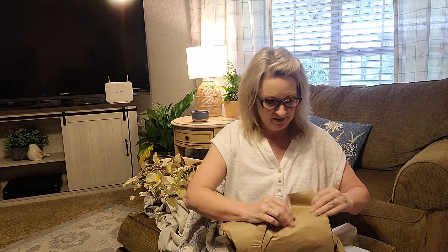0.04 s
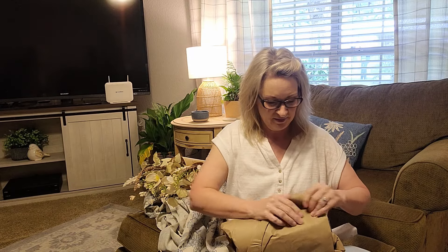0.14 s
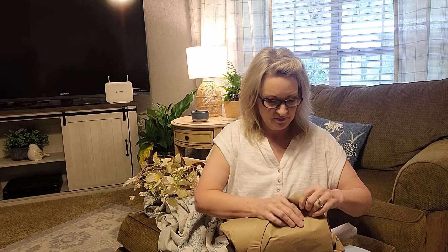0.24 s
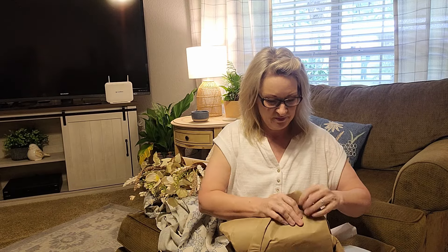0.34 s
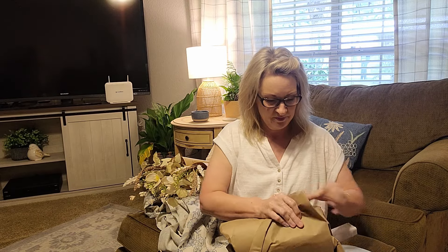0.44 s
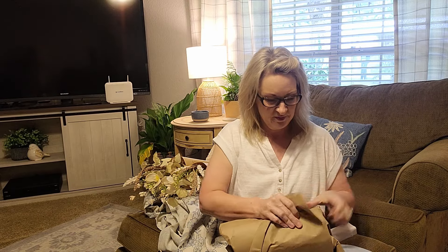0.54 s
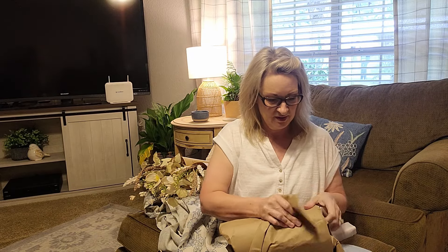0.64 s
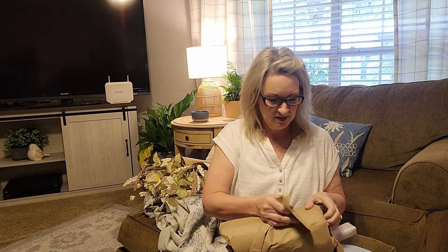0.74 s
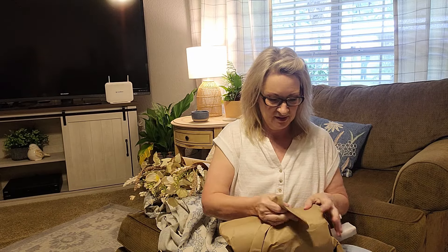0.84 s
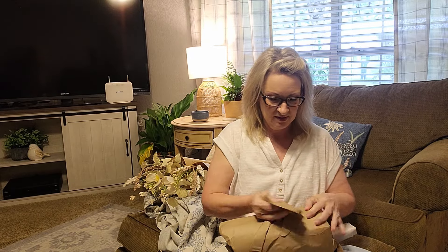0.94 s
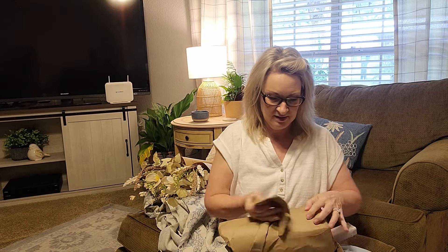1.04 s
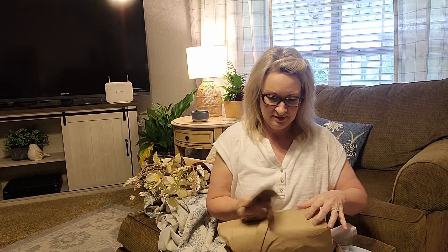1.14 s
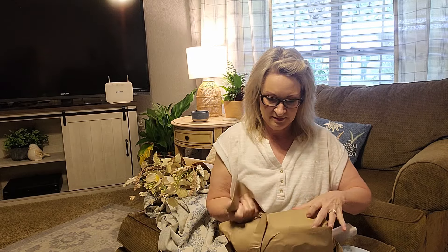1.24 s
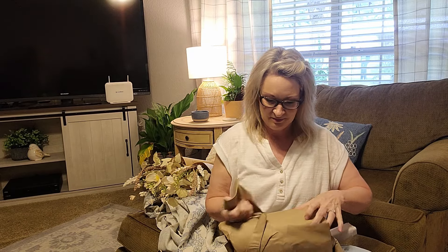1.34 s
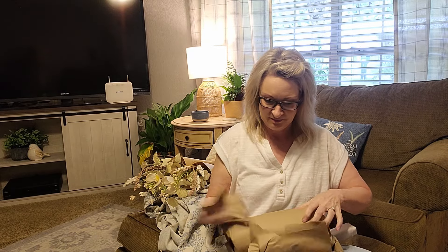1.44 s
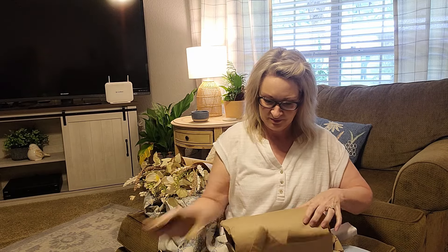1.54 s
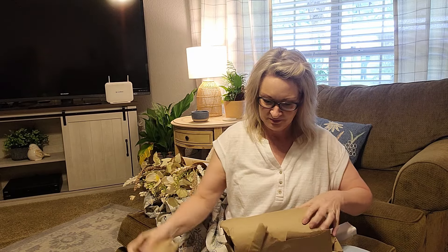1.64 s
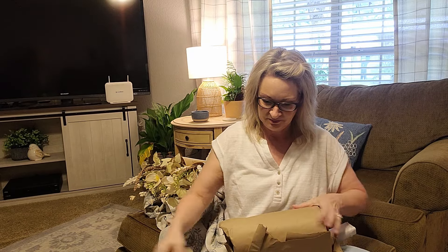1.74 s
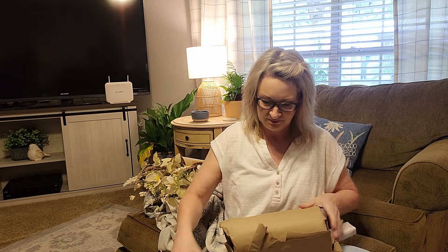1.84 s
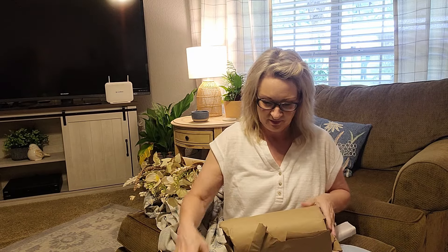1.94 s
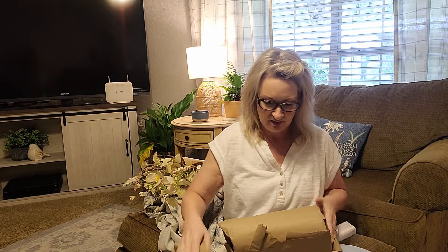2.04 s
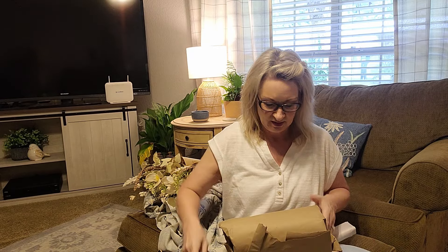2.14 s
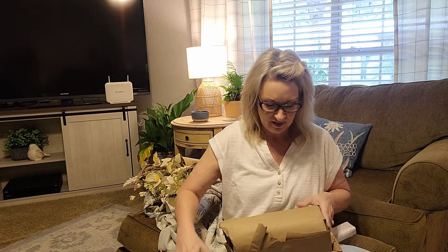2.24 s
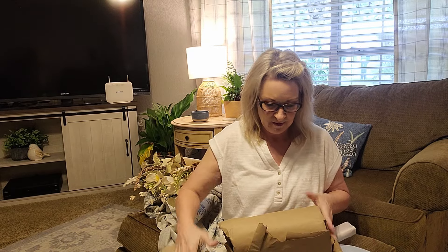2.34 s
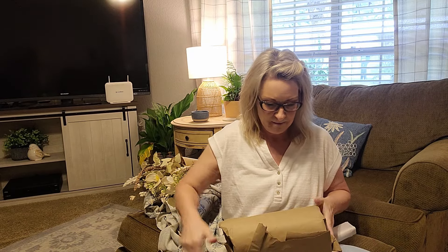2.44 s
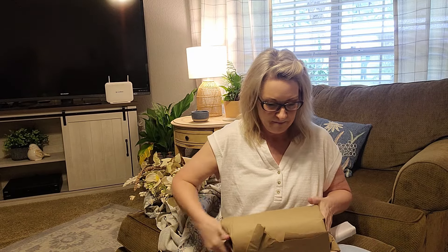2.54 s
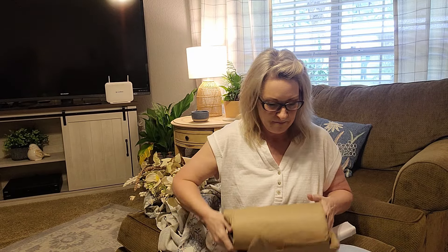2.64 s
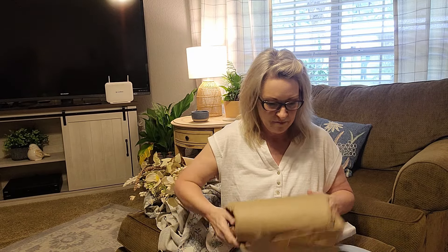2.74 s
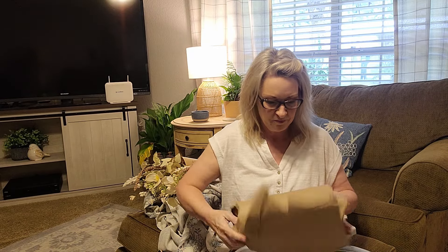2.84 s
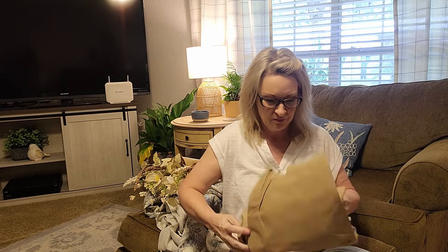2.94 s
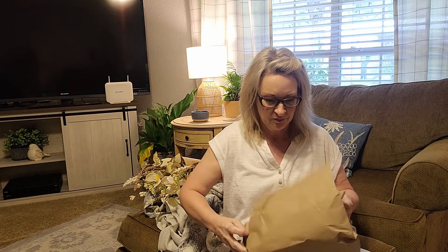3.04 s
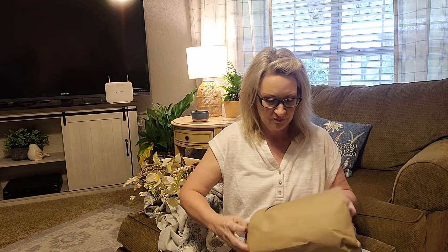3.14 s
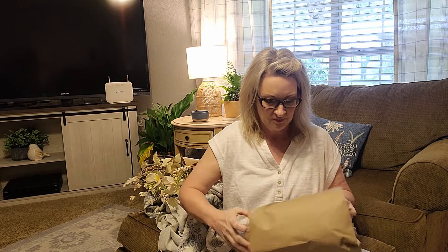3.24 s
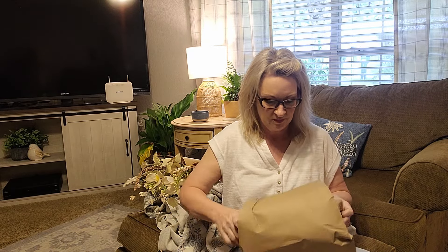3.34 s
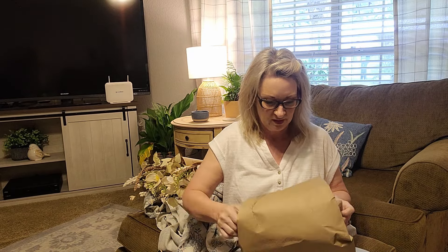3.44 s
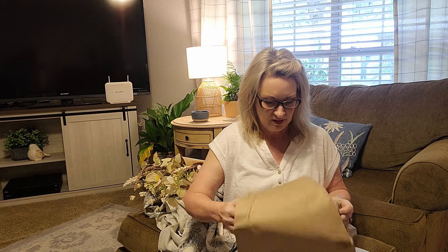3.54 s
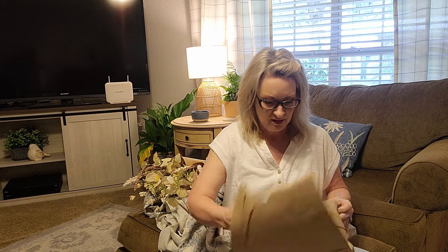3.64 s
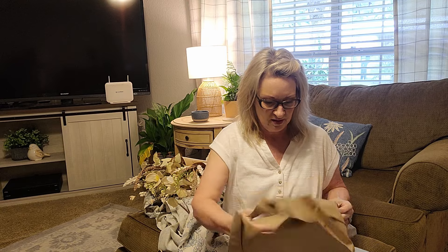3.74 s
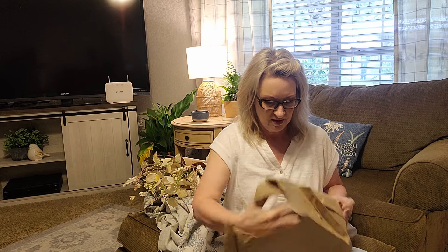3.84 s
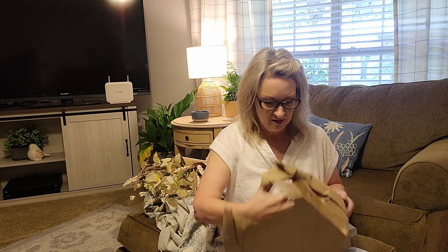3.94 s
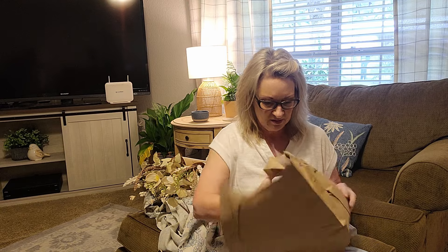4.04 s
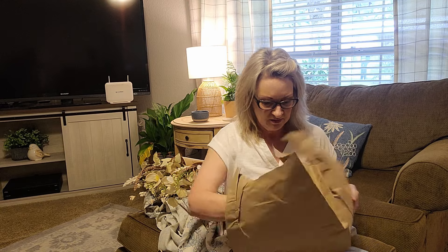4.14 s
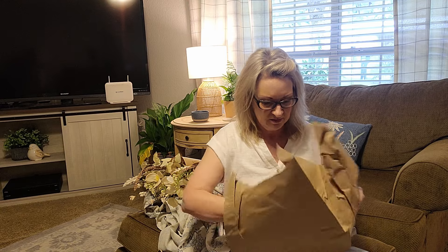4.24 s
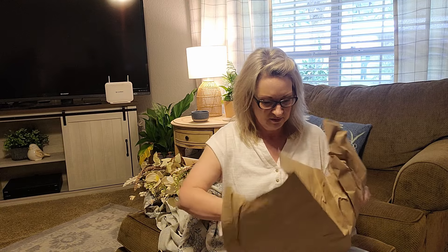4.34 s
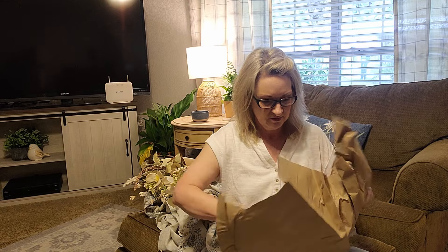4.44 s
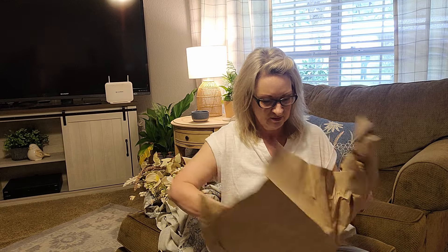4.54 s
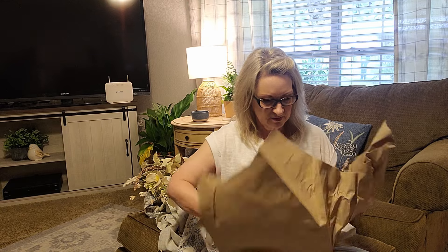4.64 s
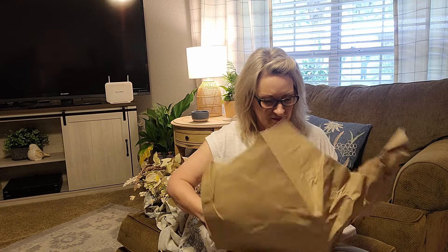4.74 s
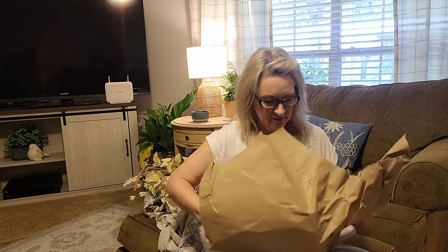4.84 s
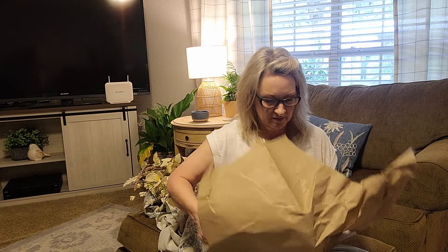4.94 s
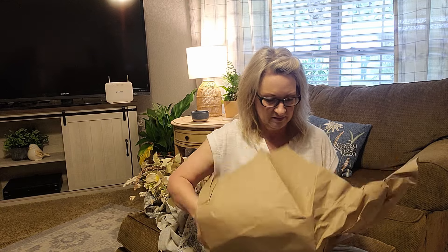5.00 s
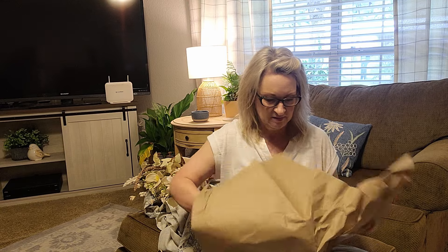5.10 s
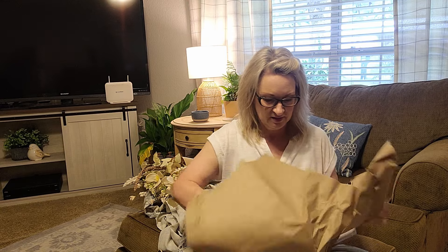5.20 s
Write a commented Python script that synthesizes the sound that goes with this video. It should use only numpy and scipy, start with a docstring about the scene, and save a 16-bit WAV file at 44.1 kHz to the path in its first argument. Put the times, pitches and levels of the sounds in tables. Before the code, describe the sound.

Stiff brown wrapping paper crackles and snaps sharply as hands tear, turn and pull open a soft parcel in a quiet furnished living room.

```python
"""Sharp snaps and clumped dry crackles over hollow booms: stiff brown paper round a parcel is torn,
turned and pulled open by hand in a furnished living room.
Noise bursts make the creases that buckle; ringing modes make the parcel's panels and hollow; falling
sines make its soft bumps. Two close microphone ports hear the paper, the left a little earlier,
with a short soft room and a bed of low air noise."""
import sys
import numpy as np
from scipy import signal
from scipy.fft import rfft, irfft, next_fast_len
from scipy.io import wavfile
from scipy.ndimage import map_coordinates

SR = 44100
rng = np.random.default_rng(int(sys.argv[2]) if len(sys.argv) > 2 else 0)


def materialize(psi):
    """Save the field psi as 16-bit PCM at rate SR to the path in sys.argv[1].

    A 1-D psi becomes a single channel; in a 2-D psi each row is a channel.
    """
    bounded = np.clip(np.atleast_2d(psi).T, -1, 1)
    quanta = np.round(bounded * 32767).astype(np.int16)
    wavfile.write(sys.argv[1], SR, quanta)


N = 232346

# Large creases that buckle: (t/s, level/dB before colouring, crease f/Hz,
# then pairs for the body: boom/dB re level, boom f/Hz, knock/dB re level, knock f/Hz,
# then crisp edge/dB re level, fibre fizz/dB re level before any lift, left-right/dB)
CREASES = [(0.0817, -27, 1620, -19, 307, -10, 1280, -8, -30, -2),
           (0.1191, -15.5, 6800, -39, 522, -25, 1400, -8, -21, 10.5),
           (0.128, -25.5, 2000, -35, 377, -27, 1260, -6, -25, -9),
           (0.1467, -33, 2800, -11, 361, -2, 860, -7, -17, -1),
           (0.177, -19.5, 1750, -24, 291, -14.5, 853, -3, -21, 5),
           (0.2674, -29, 2860, -15, 433, -5, 1190, -12, -27, 1.5),
           (0.2773, -29, 1560, -22, 404, -12, 1190, -11, -9.5, 5),
           (0.3042, -27.5, 1590, -12.5, 320, -11, 781, -22, -32, 1.5),
           (0.3292, -31.5, 1510, -34, 390, -2, 1190, -23, -34, -1),
           (0.4051, -36, 2020, -5, 415, -5, 1200, -2, -15, 1),
           (0.4539, -25, 1420, -7, 423, -7, 1260, -6, -19, 1.0),
           (0.4988, -34, 1610, -31, 285, -8, 1130, -3, -31, 2.5),
           (0.5327, -23, 6900, -34, 269, -34, 1240, -3, -12, 3),
           (0.5503, -30, 4400, -7, 431, -7, 1160, -7, -7, 2),
           (0.5826, -17.5, 3720, -13.5, 396, -20, 1170, -10, -9, 3),
           (0.617, -19.5, 1450, -10.5, 358, -4.5, 1260, -19, -19, -2),
           (0.6579, -27, 1670, -2, 299, -6.5, 770, -13, -24, 2.5),
           (0.6908, -25, 7560, -13, 277, -23, 805, -3.5, -25, 4),
           (0.7253, -25.5, 1780, -36, 248, -31, 1280, -16, -23, 4),
           (0.7687, -26, 7520, -17, 304, -12, 1190, -10, -25, 5),
           (0.798, -30, 5100, -3.5, 312, -9, 840, -10, -24, 2),
           (0.819, -20.5, 1410, -24, 191, -18, 929, -2, -12, 5),
           (0.8799, -18.5, 7490, -21, 269, -20, 797, -6, -13, 0),
           (0.9143, -23, 7300, -44, 212, -25, 1340, -17, -4.5, 4),
           (0.9283, -15, 2370, -27, 250, -23, 1360, -13, -10, 0),
           (0.9408, -11, 2280, -18.5, 285, -10, 1190, -11, -22, 1.5),
           (0.956, -11, 7200, -25, 296, -31, 1130, -7, -15, 4),
           (1.074, -27, 4330, -14, 400, -28, 1130, -8, -8, 2.5),
           (1.1418, -21.5, 2890, -25, 447, -5.5, 1090, -19, -16, -3),
           (1.1717, -17, 2030, -15, 310, -22, 773, -19, -13.5, 3),
           (1.2146, -25.5, 4740, -35, 506, -15, 740, -8, -15, 8),
           (1.2379, -15.5, 3220, -18, 490, -16, 1010, -16, -17, 3),
           (1.4102, -30, 2890, -23, 382, -16, 1180, -1, -19, 2.0),
           (1.4486, -17, 7360, -22, 501, -31, 1200, -1, -10, 3),
           (1.4716, -17, 3370, -17, 304, -6.5, 1180, -14.5, -15, 0.5),
           (1.5349, -8.5, 1630, -19.5, 345, -12.5, 1430, -18, -27, -4),
           (1.6417, -31, 3800, -24, 425, -9, 861, 0, -24, 3.5),
           (1.7374, -34, 2450, -17, 231, -9, 1280, -10.5, -23, 9),
           (1.8734, -42.5, 1390, -12, 307, -8, 990, -7, -20, 1.5),
           (1.9634, -44, 3240, -19, 400, -13, 1160, -10, -31, -4),
           (2.1377, -40.5, 1430, -5.5, 304, -5, 799, -13, -29, -2),
           (2.1855, -41, 4700, -19, 549, -2, 1190, -7, -13, 4),
           (2.2574, -47.5, 3580, 1.5, 324, -17, 799, -8, -7, 7),
           (2.3725, -33.5, 2410, -12, 301, -6.5, 860, -12, -41, 4),
           (2.4169, -39, 2350, 1, 159, -4, 1020, -6, -29, -1),
           (2.5351, -41.5, 1420, 11.5, 435, 10.5, 853, -8.5, -34, 2),
           (2.5636, -27.5, 1340, -26, 388, -16, 1390, -10, -19, 0.5),
           (2.5813, -30, 1710, -7, 417, -13, 1220, 2.5, -13, 0),
           (2.6135, -22.5, 1850, -12, 490, -18, 1200, 2.5, -10.5, 3.5),
           (2.6499, -30, 4620, -7, 503, -5, 867, -14, -17, -5),
           (2.7167, -29.5, 3600, -27, 506, -0.5, 1140, -14, -35, 1.0),
           (2.8884, -34.5, 1750, -2, 477, -4, 926, -7, -25, 2.0),
           (2.9118, -27.5, 4600, -3, 304, -1.5, 820, -2, -13, 1),
           (3.0086, -31.5, 4940, -25, 476, -27, 1300, 1, -17, -1),
           (3.0306, -29, 1980, -13, 328, -4, 732, -7, -26, -1),
           (3.0485, -23.5, 2850, -12.5, 396, -9, 1140, -8, -36, -1),
           (3.0844, -23.5, 2140, -33, 503, -6, 1140, -7, -36, 2.0),
           (3.1308, -29, 4050, -13, 310, 1, 804, -5, -22, 4),
           (3.1662, -30.5, 1940, -20, 398, 3, 853, -12, -32, 4),
           (3.1956, -31.5, 2460, -18, 404, -8, 848, -13, -38, -9),
           (3.2385, -30.5, 1660, -6, 310, -2, 840, -7, -32, 1.0),
           (3.2829, -31, 1960, -23, 410, -18, 1040, -20, -31, -4),
           (3.3004, -17.5, 1380, -10, 315, -4, 920, -8.5, -29, 0),
           (3.3383, -25, 3400, -27, 409, -20, 1030, -6, -24, 7),
           (3.3718, -35.5, 1600, 2.5, 153, 0, 780, -3, -26, 1),
           (3.4555, -25.5, 3680, -10, 161, -2, 1190, 2, -11, 2),
           (3.5015, -32, 1960, -15, 430, 0, 859, -13, -23, 1.0),
           (3.5249, -31, 1910, -24, 339, -23, 880, -11, -31, -4),
           (3.5622, -27, 3150, -18, 428, -1, 730, 4, -9, -1),
           (3.5713, -14.5, 7110, -32, 312, -9.5, 719, 0, -17.5, 1),
           (3.6194, -24, 1590, -5, 405, -3, 859, -11, -22, 2.0),
           (3.6401, -17, 1410, -16, 487, -5.5, 869, -12, -27, 1.0),
           (3.6794, -27, 1460, -2.5, 494, 4, 755, -24, -23, -2),
           (3.7738, -30, 1780, -8, 550, -1, 1170, -11, -27, 5),
           (3.8463, -35, 1522, -10, 307, -1.5, 1120, -22, -35, -6),
           (3.896, -26.5, 2100, -10, 326, 1.5, 867, 1, -25, 2.5),
           (4.0552, -29, 1520, -7, 382, -1.5, 1230, -8, -29, 4),
           (4.115, -32.5, 3300, -6, 315, -14, 1190, -12, -16, 3),
           (4.2076, -38, 4730, 10.5, 354, 9, 818, -8, -31, -1),
           (4.2276, -32, 1710, -8, 304, -5, 790, -19, -27, -8),
           (4.4134, -28.5, 3500, -22, 143, -21, 1370, -4, -30, 2.5),
           (4.4268, -29, 1420, -5.5, 318, -21, 1020, -1, -23, 1),
           (4.4608, -24, 2740, -18, 296, -13, 795, -22, -32, 0.5),
           (4.5186, -33, 1440, 6.5, 310, 3.5, 805, -11, -31, 1.5),
           (4.5635, -23.5, 1520, -15, 151, -14, 910, -6, -34, -1),
           (4.6468, -27, 1460, -9, 301, -7, 1410, -14, -31, -4),
           (4.7267, -18, 1520, -25, 310, -11, 719, -1, -23, 1),
           (4.8155, -21.5, 1400, -15, 417, -3, 1280, -2, -39, -1),
           (4.8589, -26, 1860, -7, 310, -17, 1130, -25, -43, 0),
           (4.9015, -35, 1610, 4, 307, -1, 832, -16, -33, 2.0),
           (4.9327, -17, 2380, -8.5, 407, -12, 853, 3, -13.5, 0.5),
           (5.0264, -28, 1410, -15, 318, -22, 1400, -14, -40, 3),
           (5.0449, -21, 1560, -31, 320, -25, 988, -7, -43, -10),
           (5.0883, -22, 3400, -28, 525, -7, 974, -3, -24, 1),
           (5.1542, -26.5, 1430, -2.5, 312, -1, 918, -14, -25, 1.0),
           (5.1766, -17.5, 4000, -12.5, 291, -6, 848, -1, -18.5, 2.0),
           (5.1946, -25.5, 5600, -3.5, 480, -10, 1210, -2, -25, 1),
           (5.2245, -19.5, 1390, -8.5, 296, -3.5, 869, -2, -17, 2.5)]
# Moves of the hands (tugs, tears, folds), each a swell of crackle:
# (t of peak/s, rise/s, fall/s, peak level/dB, then re that level: fizz/dB, knock/dB, boom/dB)
HAND_MOVES = [(.01, 0.15, 0.023, -41.5, -12.5, -5, -2.5), (.14, 0.068, 0.049, -42.5, -5, -3, -16),
              (.3, 0.18, 0.19, -47.5, -18, -2, -8), (.46, 0.065, 0.04, -46, -18, -12.5, -9),
              (.6, 0.05, 0.15, -40, -3, -12, -12), (.65, 0.05, .05, -41.5, -3, 5, 3),
              (.7, 0.094, 0.088, -37.5, -4.5, -5, -4.5), (.83, .1, 0.042, -37, -2.5, -3.5, -25),
              (.945, 0.06, 0.039, -25, -5.5, -11, -29), (1.15, 0.14, 0.15, -38, -7.5, -24, -6.5),
              (1.23, 0.11, 0.053, -25.5, -8.5, -9.5, -21), (1.46, 0.081, 0.1, -34, -2, -27, -26),
              (1.52, 0.14, 0.041, -23.5, -16.5, -29, -23), (1.738, 0.086, 0.041, -47, -9, -5, -2.5),
              (1.97, 0.13, 0.059, -51, -9.5, -4, -5), (2.16, 0.051, 0.17, -55, -11, -7, -14),
              (2.26, 0.032, .06, -63.5, -8, -6, -3), (2.38, 0.056, .1, -50, -14.5, -3.5, -0.5),
              (2.6, 0.063, 0.17, -39.5, -15, -1, -10), (2.91, 0.14, .06, -46, -7.5, 1, 1.5),
              (3.08, 0.16, 0.1, -46, -11.5, -12, -18), (3.318, 0.1, 0.085, -36.5, -16, -1.5, -5),
              (3.46, 0.015, 0.037, -41, -5, 0.5, -14), (3.58, 0.078, 0.069, -36, -6.5, -11, -10),
              (3.66, 0.18, 0.24, -37, -16, -4, -14), (3.9, 0.054, 0.11, -41.5, -16, -17, -12),
              (4.121, 0.15, 0.16, -39.5, -16, -1.5, -0.5), (4.22, 0.12, 0.19, -44, -26, 0, -2),
              (4.45, 0.039, .05, -42.5, -10.5, 0, -6), (4.53, .015, 0.075, -52, -15, 9, 9),
              (4.58, 0.098, 0.18, -39.5, -19, -6.5, -14), (4.732, 0.099, 0.2, -35, -12, -4.5, -5.5),
              (4.933, 0.02, 0.074, -33, -14.5, -1, -6), (5.06, 0.033, 0.17, -38.5, -18, 0.5, 0.5),
              (5.2, 0.13, 0.17, -52, -14, 5, -4)]
# Relative colour of the sheet's crackle, its crisp edges and its fibre fizz: (f/Hz, level/dB per Hz)
SHEET_COLOUR = [(700, -6), (1300, 0.5), (1600, 2), (2100, 0), (3300, 2.5), (4200, -1), (5500, -24),
                (8000, -34)]
EDGE_COLOUR = [(2500, -34.5), (4000, -10), (5200, 4.5), (6100, -3), (7300, -1), (8500, -14.5),
               (10000, -30.5)]
FIBRE_COLOUR = [(6000, -45), (8500, -2.5), (10000, -0.5), (12000, 7), (14500, -0.5), (16000, -2)]
# Modes of the parcel's large flat panels and of its hollow: (f/Hz, width/Hz, relative level/dB)
PANEL_MODES = [(737.6, 140, -1), (852, 153, 4), (1174, 194, -3), (1493, 180, -6.5)]
HOLLOW_MODES = [(158.7, 27, -8.5), (312.7, 51, -1), (394, 99, -3.5), (504.4, 102, -7)]
# How alike the wide sheet sounds at the two ports: (f/Hz, likeness)
SHEET_LIKENESS = [(300, 1), (1000, 0.79), (3000, 0.47), (8000, 0.06), (15000, 0.18)]


def rustle():
    """One crackle drives the sheet, its edges and fibres; a sparser flexing joins it in panels and hollow."""
    # Faint handling between the moves: (t/s, crackle level/dB, fizz level/dB, body level/dB)
    handling = [(0, -49, -64, -55.5), (.52, -56, -62.5, -66), (.75, -48, -61, -64), (1.03, -47.5, -60, -66),
                (1.42, -47, -73.5, -53.5), (1.68, -72, -69, -70.5), (1.82, -66, -74, -74.5),
                (2.08, -100, -83, -79), (2.25, -62, -64, -71), (2.5, -87, -78, -79),
                (2.72, -59, -69.5, -66.5), (3.14, -48, -63.5, -66), (3.43, -54, -65, -54),
                (3.83, -67.5, -77, -52), (4.36, -50, -60, -54.5), (4.59, -48, -61, -52),
                (4.89, -48, -80, -51), (5.27, -43, -55, -42)]
    t, *columns = np.transpose(handling)
    crackle_db, fizz_db, body_db = [np.interp(np.arange(N) / SR, t, c) for c in columns]
    _, snap_db, _, snap_boom_db, _, snap_knock_db, _, _, snap_fizz_db, _ = np.transpose(CREASES)
    *_, move_db, move_fizz_db, move_knock_db, move_boom_db = np.transpose(HAND_MOVES)

    def level_curve(handling_db, near_snap_db, in_move_db):
        """Powers of the three kinds of handling add."""
        return np.sqrt(amp(2 * handling_db) + stir(near_snap_db) + moving(in_move_db))

    level = level_curve(crackle_db, snap_db, move_db)
    # small crackles round each snap carry its fizz, knock and boom, each with a set lift in dB
    fizz = level_curve(fizz_db, snap_db + snap_fizz_db + 7.5, move_db + move_fizz_db)
    knock = level_curve(body_db, snap_db + snap_knock_db + 9, move_db + move_knock_db)
    boom = level_curve(body_db, snap_db + snap_boom_db + 12.5, move_db + move_boom_db)
    # the crisp edge follows a course between crackle and fizz
    edge_share = 0.56
    edge = amp(1.5) * level ** (1 - edge_share) * fizz ** edge_share

    drive = crackle(rate=260, spread_db=4.0, scrape=0.78)
    flex = crackle(rate=140, spread_db=3.5, scrape=0.53)
    layers = ((level, SHEET_COLOUR), (edge, EDGE_COLOUR), (fizz, FIBRE_COLOUR))
    sheet = sum(gain * unit(filtered(drive, causal(colour))) for gain, colour in layers)
    panels = knock * unit(filtered(drive + 1.6 * flex, resonances(PANEL_MODES)))
    hollow = boom * unit(filtered(0.32 * drive + flex, resonances(HOLLOW_MODES)))
    return pair(SHEET_LIKENESS, sheet + panels + hollow)


def moving(level_db):
    """Power of the moves: a steady swell in dB to the peak, then a steady fall."""
    t_peak, rise, fall = np.transpose(HAND_MOVES)[:3, :, None]
    step = 64  # samples between points of the curve
    late = np.arange(0, N + step, step) / SR - t_peak
    swell_db = 17.5  # gained over the rise, lost over the fall
    drop_db = swell_db * np.maximum(-late / rise, late / fall)
    power = amp(2 * (level_db[:, None] - drop_db)).sum(0)
    return np.interp(np.arange(N) / step, np.arange(len(power)), power)


def stir(level_db):
    """Power of the small crackles that lead up to each snap and trail after it."""
    before_s, after_s = 0.0031, 0.013  # time constants of the power
    late = np.arange(-SR // 8, SR // 8 + 1) / SR
    shape = np.exp(np.where(late < 0, late / before_s, -late / after_s))
    stir_db = -23  # re the given level
    hits = lay(np.transpose(CREASES)[0], amp(2 * (level_db + stir_db))[:, None])
    return np.abs(signal.fftconvolve(hits, shape, "same"))


def crackle(rate, spread_db, scrape):
    """Small buckles come in clumps, few large among many small, over the scrape of paper on paper."""
    busy = rate * amp(5 * wobble(30))  # buckles per second
    t = np.flatnonzero(rng.random(N) < busy / SR) / SR
    draw = rng.random((len(t), 3))
    size = amp(-spread_db * np.log(1 - .97 * draw[:, 0]))
    pitch_hz = 1200 * 3.9 ** draw[:, 1]
    t60 = 0.013 + 0.042 * draw[:, 2]
    small = buckles(t, size, pitch_hz, t60, rise=0.000079, focus=1.53)
    scraping = amp(1.37 * wobble(25)) * rng.standard_normal((2, N))
    return unit(unit(small) + scrape * scraping)


def buckles(s, size, hz, t60, rise, focus):
    """Each buckle is a dying noise burst, focused round its crease's pitch; two unrelated ones for width."""
    t = np.arange(640) / SR
    octaves = np.log2((np.fft.rfftfreq(len(t), 1 / SR) + 1) / hz[:, None])
    tint = 1 + focus * np.exp(-(octaves / 0.16) ** 2)
    burst = irfft(rfft(rng.standard_normal((2, len(s), len(t)))) * tint)
    # decay, soft onset, and a fade that closes the short window
    burst *= amp(-60 * t / t60[:, None]) * (1 - np.exp(-t / rise)) * (1 - (t / t[-1]) ** 2)
    peak = np.abs(burst).max(axis=2, keepdims=True)
    return np.array([lay(s, rows) for rows in size[:, None] * burst / peak])


def snaps():
    """Large buckles, each from its own side: a crack of the sheet, and one push on panels and hollow."""
    columns = np.transpose(CREASES)
    s, db, hz, boom_db, boom_hz, knock_db, knock_hz, edge_db, fizz_db, pan_db = columns
    t60 = np.full(len(s), 0.013)  # s

    def burst(level_db, focus):
        """The same creases at another level, with fresh noise."""
        return buckles(s, amp(level_db), hz, t60, rise=0.0012, focus=focus)

    crack = filtered(burst(db, 1.97), causal(SHEET_COLOUR))
    crack += filtered(burst(db + edge_db, 2.4), causal(EDGE_COLOUR))
    crack += filtered(burst(db + fizz_db + 8.5, 0), causal(FIBRE_COLOUR))  # fizz lifted 8.5 dB
    knock = pushes(s, db + knock_db, knock_hz, PANEL_MODES, rise=0.0012)
    boom = pushes(s, db + boom_db, boom_hz, HOLLOW_MODES, rise=0.0027)
    # the pan follows the latest snap
    latest = np.clip(np.searchsorted(s, np.arange(N) / SR) - 1, 0, None)
    pan = amp(np.outer([.5, -.5], pan_db[latest]))
    return (pair(SHEET_LIKENESS, crack) + knock + boom) * pan


def pushes(s, level_db, near_hz, modes, rise):
    """A push rings every mode, most those near the pitch of the spot where it lands."""
    t = np.arange(SR // 16) / SR
    rows = 0
    for hz, width, db in modes:
        gain = amp(db - 48 * np.abs(np.log2(near_hz / hz)))  # 48 dB less per octave away
        rows = rows + gain[:, None] * np.sin(2 * np.pi * hz * t) * np.exp(-np.pi * width * t)
    rows = rows * (1 - np.exp(-t / rise))
    way = np.sign(rng.standard_normal(len(s)))  # a crease pops in or out
    scale = way * amp(level_db) / np.abs(rows).max(axis=1)
    return lay(s, scale[:, None] * rows)


def bumps():
    """The parcel on the lap: each padded contact is a short low sine that sags in pitch as it dies."""
    # Soft bumps: (t/s, level/dB before a 1 dB lift and the envelope, settled f/Hz)
    contacts = [(0.636, -39, 130), (0.931, -35, 91), (1.239, -65, 83), (1.524, -34, 90), (1.93, -46, 83.4),
                (2.412, -37.5, 106), (2.6, -36, 130), (2.911, -38, 134), (3.295, -38, 124),
                (3.46, -37.5, 79), (3.702, -36, 127), (4.517, -38.5, 135), (4.921, -43, 56)]
    out, t = np.zeros(N + SR), np.arange(SR // 4) / SR
    for s, db, hz in contacts:
        turns = hz * t * (1 + 0.26 * np.exp(-t / 0.05))
        envelope = amp(db + 1 - 60 * t / 0.093) * (1 - np.exp(-t / 0.0031))
        out[round(s * SR):][:len(t)] += envelope * np.sin(2 * np.pi * turns)
    return out[:N]


def room(x, parts_count):
    """Soft furnishings: a short diffuse noise tail, drawn afresh for each equal stretch of time."""
    # Decay of the room: (f/Hz, t60/s)
    decay = [(100, 0.13), (1000, 0.05), (5000, 0.12), (14000, 0.081)]
    # How alike the room's answer is at left and right: (f/Hz, likeness)
    room_likeness = [(100, 0.94), (600, 0.62), (1500, 0.63), (4000, 0.24)]
    wet = np.zeros((2, N + SR))
    limits = np.linspace(0, N, parts_count + 1).astype(int)
    delay = 130  # samples
    for a, b in zip(limits, limits[1:]):
        hz, t, z = signal.stft(rng.standard_normal((2, SR // 3)), SR, nperseg=256)
        fade = amp(-60 * t / along(decay, hz)[:, None])
        tail = signal.istft(z * fade, SR, nperseg=256)[1]
        part = signal.fftconvolve(x[None, a:b], tail / np.linalg.norm(tail[0]), axes=1)
        wet[:, a + delay:a + delay + part.shape[1]] += part
    return pair(room_likeness, wet[:, :N])


def air():
    """Low air noise and microphone hiss: coloured noise whose level drifts gently."""
    # The quiet room: (f/Hz, relative level/dB per Hz)
    air_colour = [(18, -40), (30, 9.5), (70, 9), (190, -3.5), (280, 0), (900, -15), (3300, -27),
                  (7400, -21.5), (9700, -35), (12300, -26), (16000, -40)]
    noise = filtered(rng.standard_normal((2, N)), lambda hz: amp(along(air_colour, hz)))
    wide = pair([(40, 0.98), (300, 0.56), (2000, 0.091)], noise)
    return amp(-56.5 + 2.1 * wobble(5.9)) * unit(wide)


def amp(db):
    """Gain of a level in dB."""
    return 10 ** (np.asarray(db) / 20)


def unit(x):
    """x at rms 1."""
    return x / np.sqrt(np.mean(x ** 2) + 1e-20)


def along(points, hz):
    """Reads (f/Hz, value) points on a log frequency axis."""
    f, v = np.transpose(points)
    return np.interp(np.log(hz + 1), np.log(f + 1), v)


def wobble(rate):
    """A smooth random curve, rate knots a second."""
    knots = rng.standard_normal(int(N * rate / SR) + 4)
    return map_coordinates(knots, [np.arange(N) * rate / SR])


def lay(s, rows):
    """Sums short sounds, one row each, at their times in seconds."""
    at = (s * SR).astype(int)[:, None] + np.arange(rows.shape[1])
    return np.bincount(at.ravel(), rows.ravel(), N + SR)[:N]


def filtered(x, response):
    """x times a complex response of frequency, padded so that tails do not wrap round."""
    m = 2 * next_fast_len(N // 2 + SR // 4)
    return irfft(rfft(x, m) * response(np.fft.rfftfreq(m, 1 / SR)), m)[..., :N]


def causal(points):
    """Minimum-phase response of unit mean power through (f/Hz, level/dB) points."""
    def response(hz):
        cepstrum = irfft(np.log(unit(amp(along(points, hz)))))
        # fold the second half onto the first: all energy comes as early as it can
        cepstrum[1:len(hz) - 1] *= 2
        cepstrum[len(hz):] = 0
        return np.exp(rfft(cepstrum))
    return response


def resonances(modes):
    """Causal response of unit mean power: a sum of resonances of alternating sign."""
    def response(hz):
        h = 0
        for k, (centre, width, db) in enumerate(modes):
            damping = 1j * hz * width
            h = h + (-1) ** k * amp(db) * damping / (centre * centre - hz * hz + damping)
        return h / np.sqrt(np.mean(np.abs(h) ** 2))
    return response


def pair(alike, noise):
    """Turns two unrelated signals into a left and right of the given likeness."""
    def mid_and_side(hz):
        turn = np.arccos(np.clip(along(alike, hz), -1, 1)) / 2
        return np.array([np.cos(turn), np.sin(turn)])

    mid, side = filtered(noise, mid_and_side)
    return np.array([mid + side, mid - side])


def scene():
    """Direct sound reaches the two ports with a small lead; the room and the air fill in."""
    # Balance of the two ports: (f/Hz, left-right/dB)
    port_balance = [(100, -.5), (700, 0.5), (4000, 0.5), (7500, 10.5), (10000, -3), (15000, -0.5)]
    paper = rustle() + snaps() + bumps()
    side = np.array([[.5], [-.5]])
    lead_s = .00011  # the left port is nearer

    def ports(hz):
        return amp(side * along(port_balance, hz)) * np.exp(2j * np.pi * hz * side * lead_s)

    return filtered(paper, ports) + amp(-4.5) * room(paper.mean(0), parts_count=16) + air()


def record(dry):
    """The microphone drops the deepest bass; the recorder keeps nothing above its band limit."""
    top_hz, bass_hz = 16000, 45

    def response(hz):
        return (hz < top_hz) * (1j * hz / (1j * hz + bass_hz)) ** 2

    return filtered(dry, response)


dry = scene()
out = record(dry)
materialize(out)
```